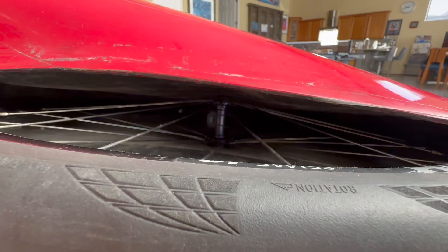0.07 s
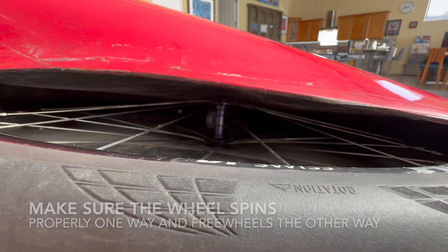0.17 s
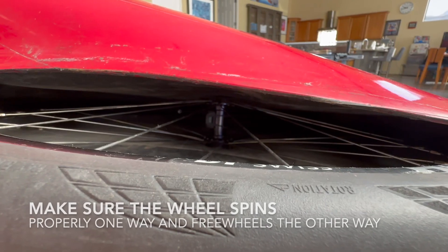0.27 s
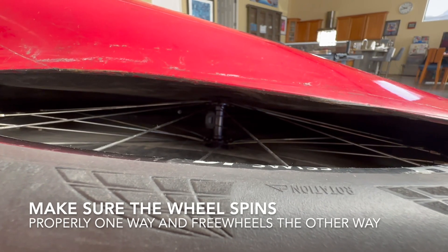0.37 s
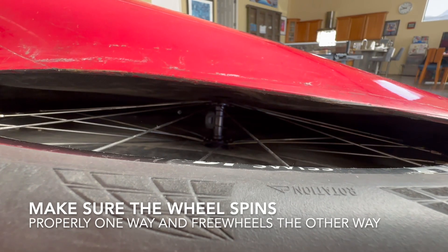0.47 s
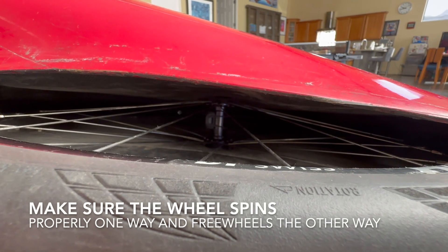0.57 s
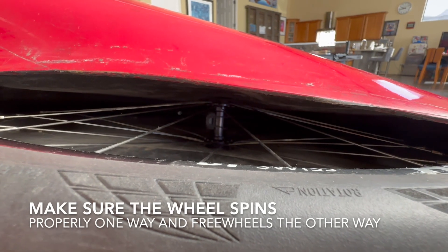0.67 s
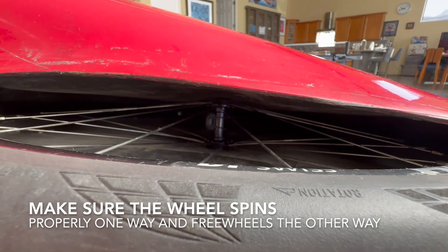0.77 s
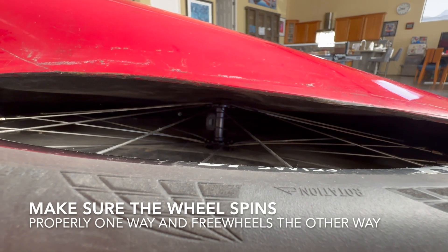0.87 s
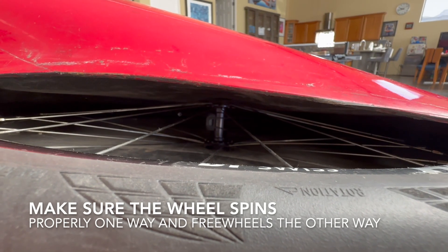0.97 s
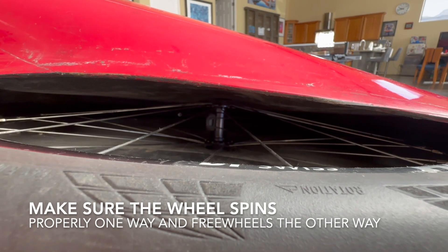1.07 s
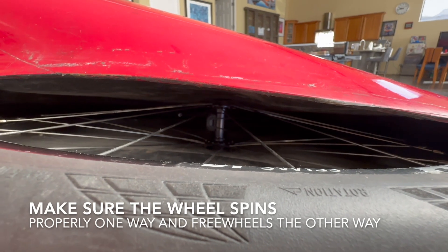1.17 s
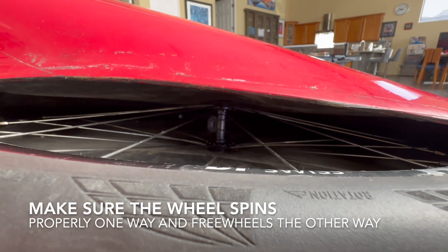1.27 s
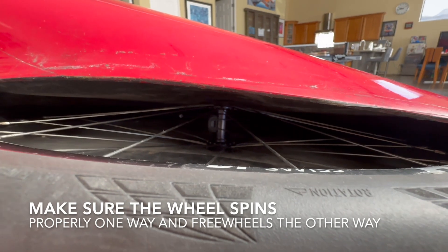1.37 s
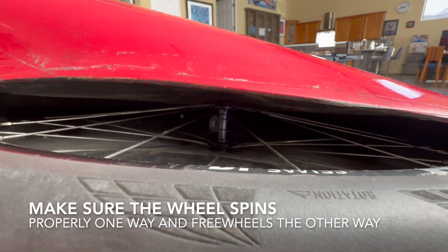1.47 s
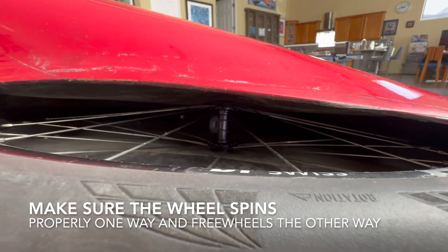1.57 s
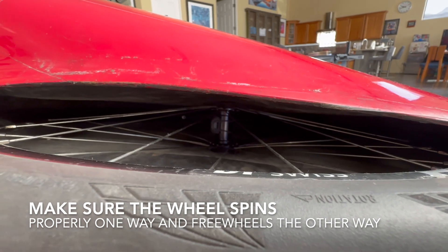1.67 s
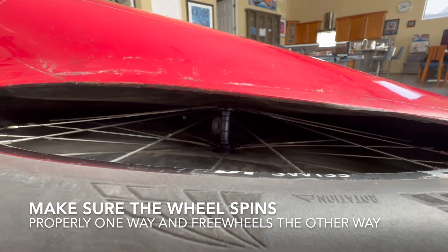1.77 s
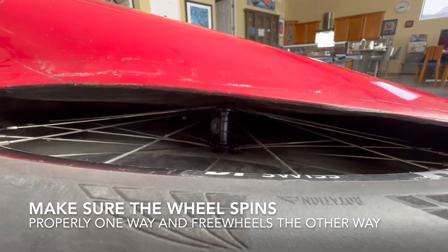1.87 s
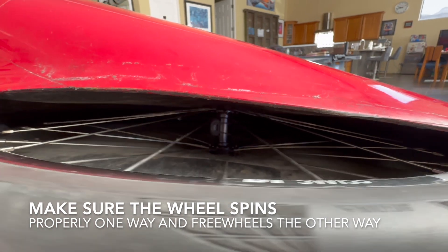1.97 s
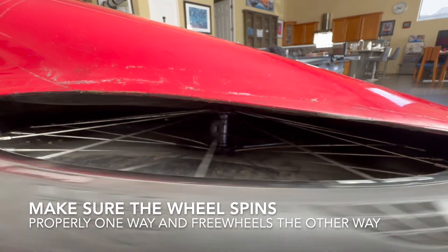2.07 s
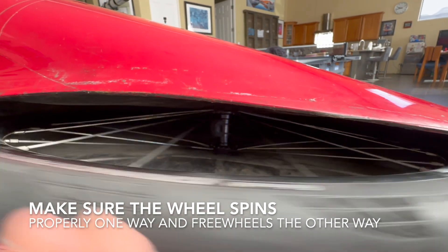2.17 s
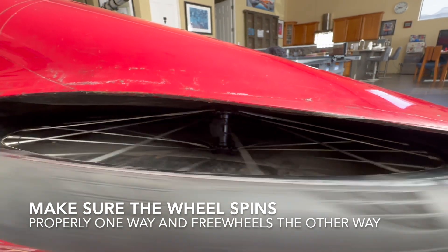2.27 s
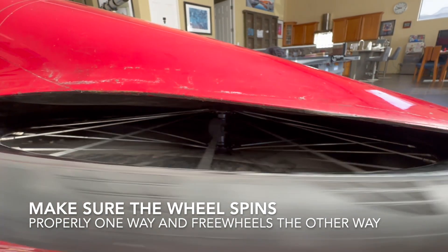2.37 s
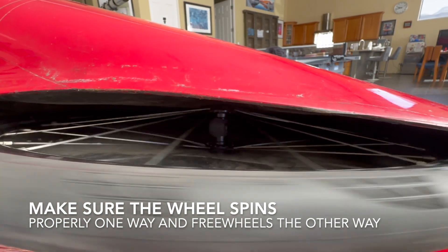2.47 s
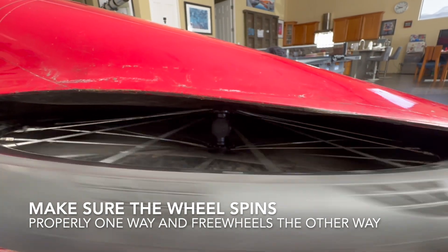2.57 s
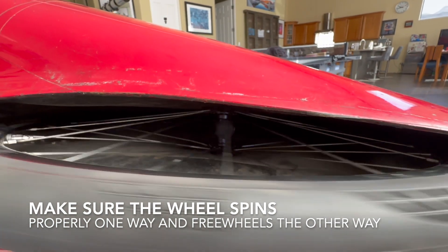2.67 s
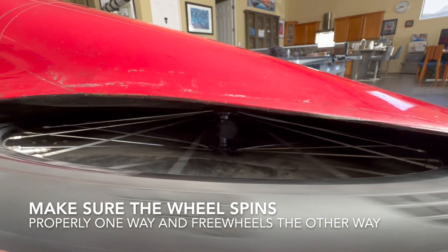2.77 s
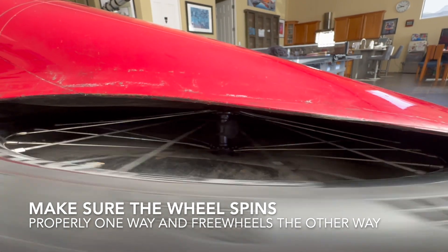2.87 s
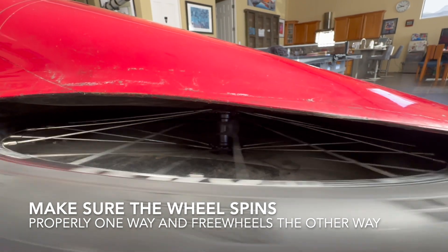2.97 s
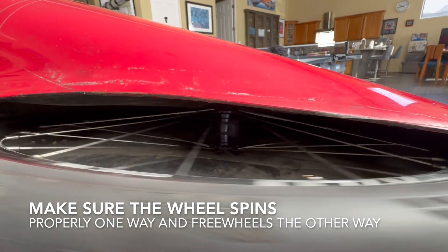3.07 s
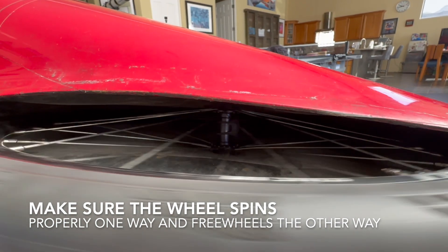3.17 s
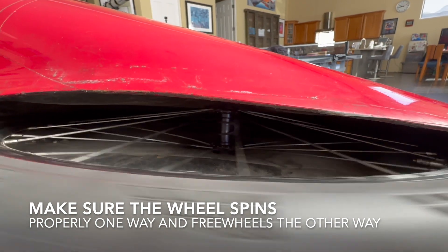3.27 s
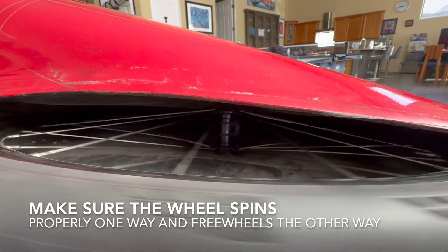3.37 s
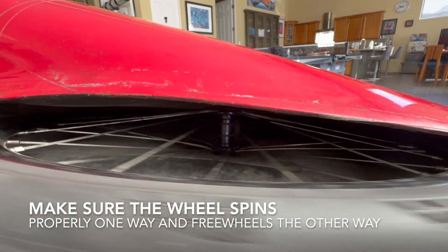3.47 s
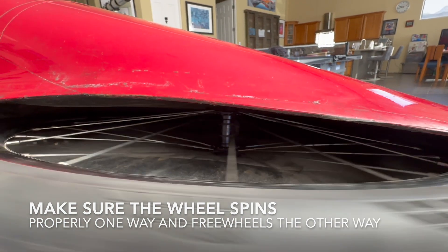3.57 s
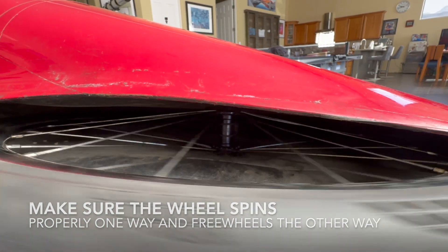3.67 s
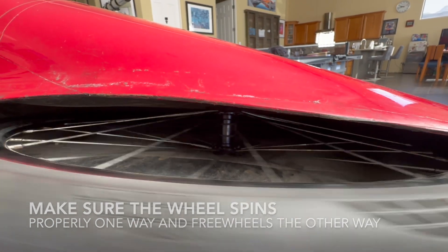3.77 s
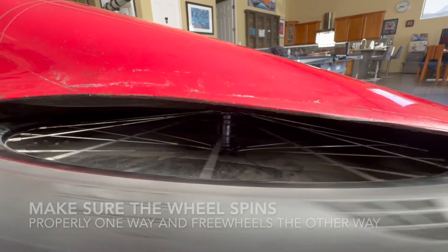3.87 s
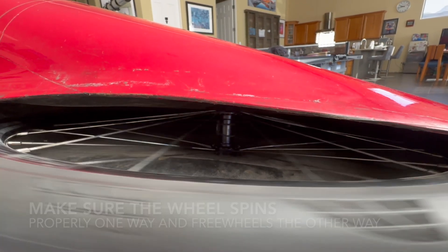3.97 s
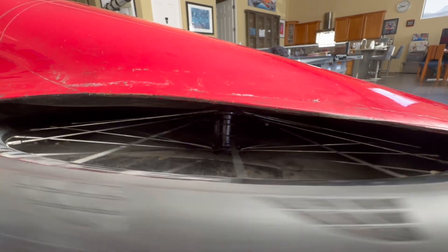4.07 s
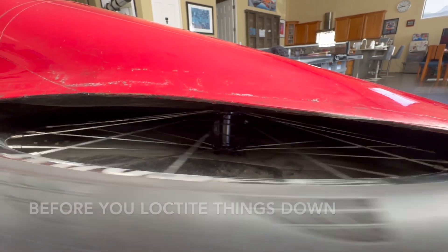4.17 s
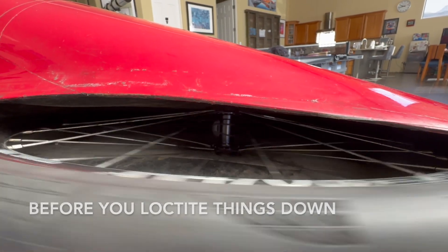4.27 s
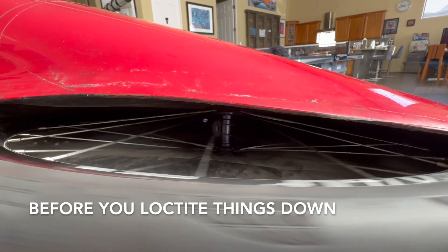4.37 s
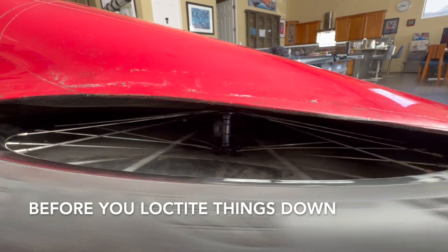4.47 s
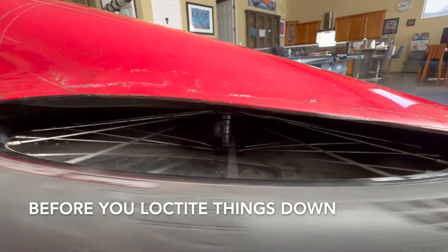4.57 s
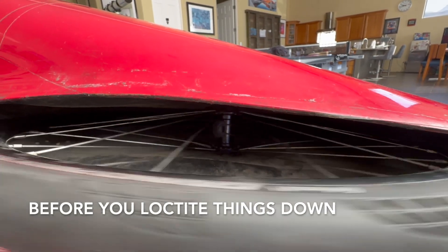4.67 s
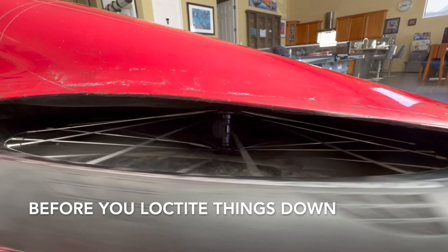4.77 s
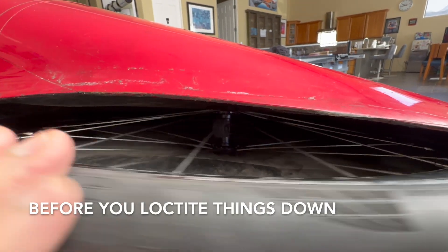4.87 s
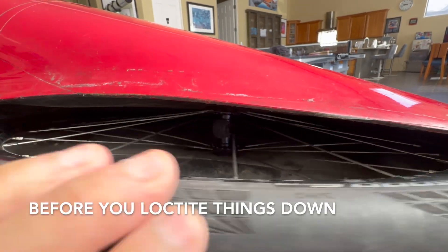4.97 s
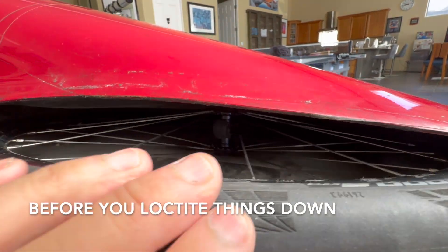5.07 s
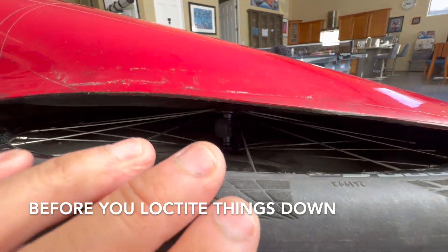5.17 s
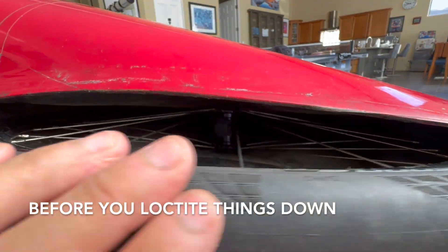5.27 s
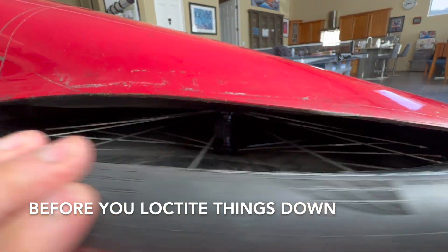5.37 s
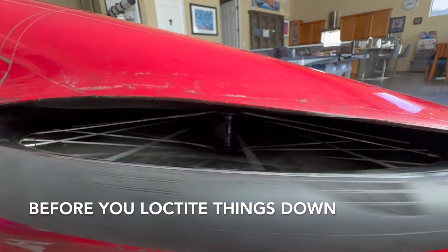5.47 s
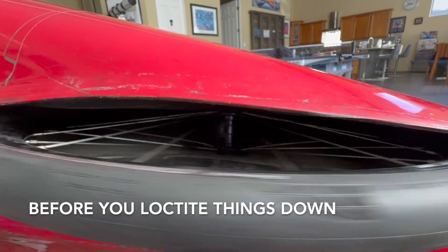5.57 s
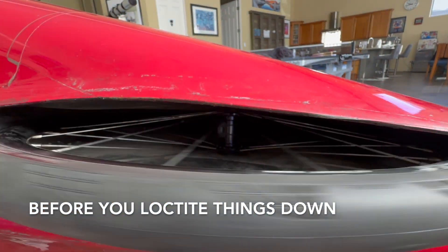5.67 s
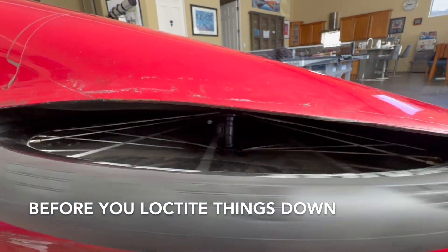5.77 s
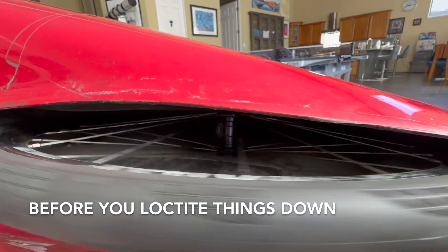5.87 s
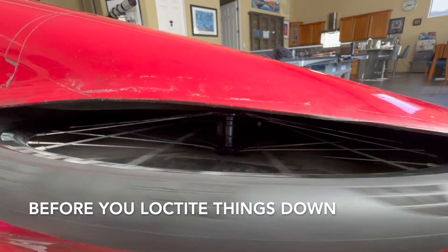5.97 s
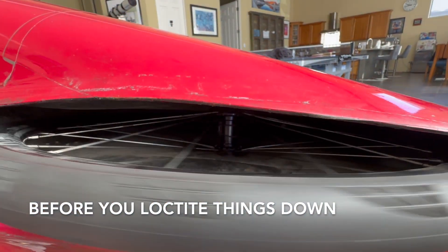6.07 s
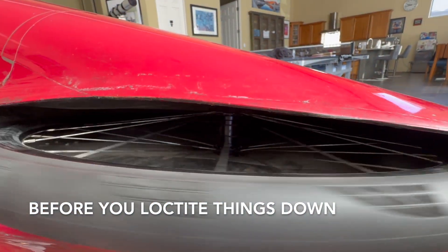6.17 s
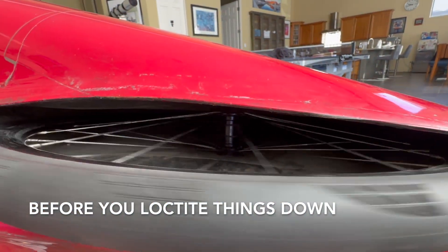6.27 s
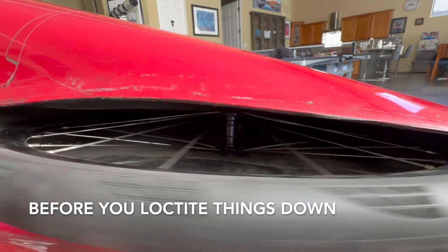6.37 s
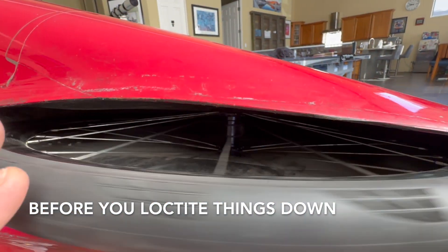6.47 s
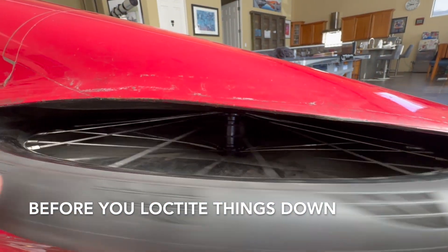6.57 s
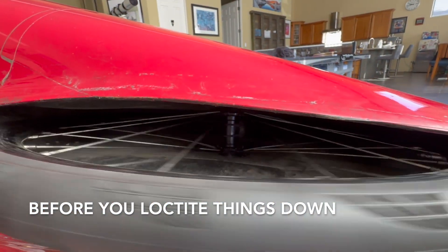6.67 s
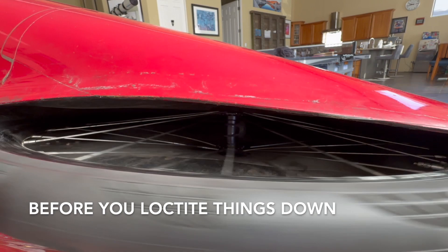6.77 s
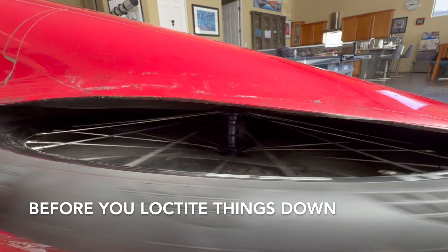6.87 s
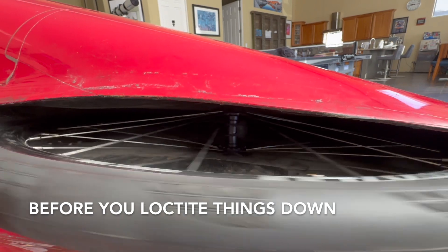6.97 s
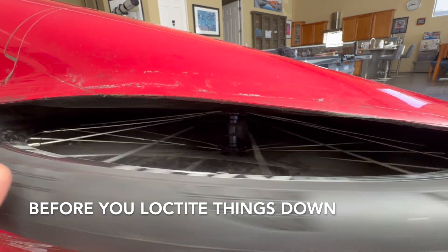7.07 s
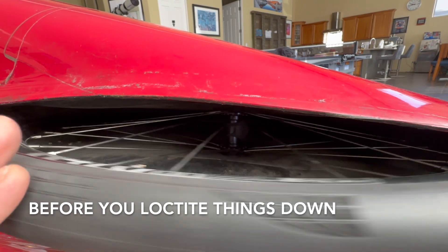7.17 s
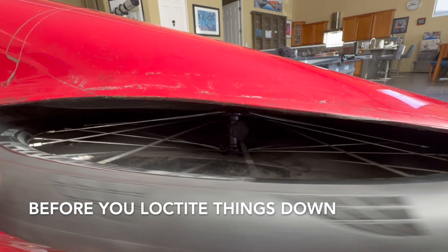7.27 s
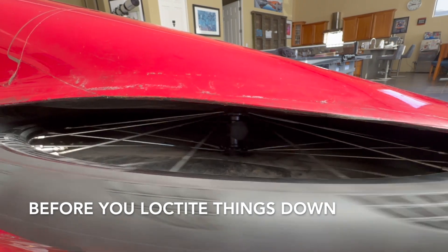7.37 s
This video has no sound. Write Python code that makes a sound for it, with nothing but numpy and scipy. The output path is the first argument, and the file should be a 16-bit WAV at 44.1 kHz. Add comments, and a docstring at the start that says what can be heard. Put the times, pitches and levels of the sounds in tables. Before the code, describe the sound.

A hand-turned cycle wheel, heard very near in a room. Quiet rubs lead to a scuff and about three seconds of regular metallic freewheel clicks, each crisp and ringing briefly, slowing a little throughout. They halt abruptly with soft low knocks. A stronger hollow thump follows as the hub locks, then the wheel runs on quietly, whirring and ticking, and is pushed again with further light bumps.

```python
"""A cycle's spoked rear wheel, hand-turned in a room, close to a stereo microphone: spun backwards it freewheels,
the pawls snapping over the ratchet teeth, slowing, until a hand catches the tyre. Pushed forwards, the hub
locks with a thump in the shell and the drive runs on with a rubbing hiss and light ticks.
Snaps, ticks, rubs and running noise are coloured noise under power envelopes; pings and thumps add decaying sines."""
import sys
import numpy as np
from scipy import signal
from scipy.fft import irfft, next_fast_len
from scipy.io import wavfile

SR = 44100
rng = np.random.default_rng(int(sys.argv[2]) if len(sys.argv) > 2 else 0)


def materialize(psi):
    """Save the field psi as 16-bit PCM at rate SR to the path in sys.argv[1].

    A 1-D psi becomes a single channel; in a 2-D psi each row is a channel.
    """
    bounded = np.clip(np.atleast_2d(psi).T, -1, 1)
    quanta = np.round(bounded * 32767).astype(np.int16)
    wavfile.write(sys.argv[1], SR, quanta)


N = 327663
TIME = np.arange(N) / SR
SIZE = next_fast_len(N, real=True)
HZ = np.maximum(np.arange(SIZE // 2 + 1) * SR / SIZE, 1)  # spectrum bins; the lowest is lifted for logarithms
ROOM_T60_S = 0.45

# resonances of hub and spokes: f/Hz, width/Hz, relative level/dB
HUB_MODES = [(365, 35, 4), (727, 110, 2), (1398, 50, 6), (2020, 63, -2), (2400, 97, 0), (2950, 45, 3),
             (3353, 240, 0), (4720, 50, 5), (5760, 65, 2), (6100, 62, 0), (6293, 70, 3), (6575, 50, 5),
             (7150, 69, 0), (7990, 120, -1), (8786, 85, 2), (9854, 70, 3), (10104, 110, 3), (11796, 110, 1),
             (13436, 135, 1)]
# broad colour of the ringing hub: f/Hz, relative level/dB per Hz
HUB_COLOUR = [(70, -27), (120, -9.5), (170, -6.5), (252, -24), (365, -15), (735, -10.5), (885, -14),
              (1390, -10), (2190, -11), (3310, -1.5), (4200, -7.5), (6400, -5.5), (7540, -4.5),
              (10500, 2.5), (12800, -5), (14600, 1), (16500, -11.5)]
# colour of small contacts in the drive: f/Hz, relative level/dB per Hz
TICK_COLOUR = [(300, -3), (800, -3), (1700, -1), (2100, -4.5), (2500, -1), (2800, -4), (3200, 4),
               (3700, -16), (4300, -10.5), (6500, -14), (10000, -23), (16000, -30)]
# spells when the drive is pushed: start t/s, end t/s, hiss level/dB before the rubbing tightens
PUSHES = [(5.349, 6.223, -57.5), (6.635, 7.424, -56)]


def from_db(db):
    """Decibels to amplitude gain."""
    return 10 ** (np.asarray(db) / 20)


def over_hz(rows):
    """Each column of a table, joined on a log-frequency axis."""
    hz, *columns = np.transpose(rows)
    return [np.interp(np.log(HZ), np.log(hz), column) for column in columns]


def stereo(colour, alike, lean_db, lead):
    """Spectrum of coloured stereo noise, rms 1 over both sides; 'alike' sets how much the sides share."""
    shared, own = rng.standard_normal((2, len(HZ))) + 1j * rng.standard_normal((2, len(HZ)))
    alike = np.clip(alike, 0, 1)
    right = alike * shared + np.sqrt(1 - alike ** 2) * own
    right = right * np.exp(-1j * lead)  # the left side leads in phase
    lean = from_db(lean_db * np.array([[0.5], [-0.5]]))
    both = from_db(over_hz(colour)[0]) * np.array([shared, right]) * lean
    return both * SIZE / np.sqrt(np.sum(np.abs(both) ** 2))


def to_time(spectrum):
    """Spectrum to samples."""
    return irfft(spectrum, SIZE)[..., :N]


def decay(age, t60):
    """Amplitude that falls 60 dB in every t60 seconds."""
    return np.exp(-np.log(1000) * age / t60)


def bursts(times, levels_db, rise, t60):
    """Summed power envelope of blows that swell and die away, each cut off after one second."""
    age, power = TIME[:SR], np.zeros(N + SR)
    shape = ((1 - np.exp(-age / rise)) * decay(age, t60)) ** 2
    for s, db in zip(times, levels_db):
        at = int(np.clip(s * SR, 0, N))
        power[at:at + SR] += from_db(db) ** 2 * shape
    return power[:N]


def held(start, end, attack, release):
    """Gain that rises, holds, then falls 60 dB per release time after the end."""
    rising = np.clip((TIME - start) / attack, 0, 1)
    return rising * from_db(-60 * np.clip((TIME - end) / release, 0, 3))


def uneven(spread_db):
    """Gain that wanders at random around 1, through 30 random points a second."""
    points = rng.standard_normal(1024)
    return from_db(spread_db * np.interp(TIME * 30, np.arange(len(points)), points))


def background():
    """Faint hiss and mains hum under the whole scene."""
    # colour of the hiss: f/Hz, relative level/dB per Hz
    air_colour = [(15, -34), (25, -1), (137, -7), (190, -13), (301, -0.5), (384, -15), (575, -6.5),
                  (695, -26.5), (1520, -17), (1740, -27.5), (3430, -26), (4610, -31), (6740, -21.5),
                  (9070, -39), (16000, -66)]
    # lean of the hiss: f/Hz, left minus right level/dB
    air_lean = [(100, 2), (1500, 1), (3500, 6), (5000, 5.5), (6000, 21.5), (8000, 30), (9600, -8),
                (11000, -1.5)]
    air = to_time(stereo(air_colour, alike=0.35, lean_db=over_hz(air_lean)[0], lead=0))
    hum = np.sin(2 * np.pi * 120 * TIME)
    return from_db(-66.0) * air + from_db(-72.5) * hum


def thumps(place):
    """Soft blows ring the shell; a duller blow reaches fewer of its modes, and loose panels shudder after it."""
    # blows on tyre and frame: t/s, relative level/dB, brightness f/Hz, contact t/s
    blows = [(0.124, -58.5, 900, 0.00092), (0.216, -61.5, 900, 0.00092), (4.871, -27, 172, 0.0033),
             (4.961, -37.5, 250, 0.0033), (5.345, -19, 469, 0.018), (6.559, -65, 900, 0.00097),
             (6.65, -42.5, 600, 0.0027), (6.767, -41.5, 600, .002), (7.157, -46, 250, .003),
             (7.339, -41.5, 700, .003)]
    # modes of shell and frame: f/Hz, relative level/dB, 60 dB decay t/s
    shell_modes = [(107.3, -6.5, 0.35), (133, 2.5, 0.051), (164, -7, 0.12), (216.3, -10, 0.34),
                   (280.5, -23, 0.19), (375.5, 1, 0.069), (477, -16, 0.21), (510, -32, 0.2),
                   (738, -9.5, 0.084), (910, -13, 0.11)]
    # colour of the shuddering panels: f/Hz, relative level/dB per Hz
    panel_colour = [(70, -40), (130, 7), (450, -10.5), (1000, -15), (3000, -28), (9000, -59)]
    shell, age = np.zeros(N + SR), TIME[:SR]
    for s, db, bright_hz, contact in blows:
        at, spread_db = int(s * SR), rng.normal(0, 2.6, len(shell_modes))
        swell = 1 - np.exp(-age / contact)
        for k, (hz, mode_db, t60) in enumerate(shell_modes):
            softening = np.hypot(1, (hz / bright_hz) ** 2)
            gain = from_db(db + mode_db + spread_db[k]) / softening
            gain = gain * (-1) ** k  # neighbouring modes start in opposite directions
            shell[at:at + SR] += gain * np.sin(2 * np.pi * hz * age) * swell * decay(age, t60)
    s, db, bright_hz, _ = np.transpose(blows)
    shudder_db = db - 13.5 + 20 * np.log10(bright_hz / 600)  # brighter blows shake the panels more
    shudder = np.sqrt(bursts(s, shudder_db, rise=0.00033, t60=0.41))
    shell = shell[:N] * from_db([[1.5], [-2.5]])  # left, right
    return shell + shudder * to_time(stereo(panel_colour, *place))


def wheel(place):
    """Running noise: bearing rustle and whirr, rumble and drone through the shell; jolts swell the rumble."""
    # creep, backward throw, freewheel, hold, forward push, run-on, second push: start t/s, end t/s,
    # then base level/dB of rustle, rumble, drone, mid-way whirr, and growth of the whirr level/dB
    moves = [(0.421, 1.508, -81, -85, -74, -64.5, 2), (1.674, 1.982, -60.5, -63, -74, -60.5, -4),
             (2.113, 5.046, -69, -62, -60, -60.5, 5.5), (5.106, 5.353, -65.5, -73, -67.5, -62, 8),
             (5.402, 6.254, -60.5, -61.5, -56, -67.5, -9), (6.294, 6.61, -73, -65, -62, -69, 7),
             (6.637, 7.43, -59.5, -61.5, -59.5, -59.5, 8.5)]
    # deep jolts of the frame: t/s, level/dB
    jolts = [(1.735, -50), (1.89, -47.5), (5.73, -41.5), (6.03, -42.5), (6.25, -55), (6.645, -56),
             (6.8, -56)]
    # colours, each f/Hz, relative level/dB per Hz: bearing rustle, rumble, drone, whirr
    rustle_colour = [(290, -12), (500, -8), (1190, -4.5), (1570, -4), (1850, -4), (2360, -1), (2600, -4.5),
                     (3240, -7.5), (5000, -14), (6500, -35), (11000, -120)]
    rumble_colour = [(15, -26.5), (25, -20), (37, -7), (49, 2.5), (62, 5), (81, -10.5), (112, 1),
                     (140, -7.5), (180, -39), (310, -120)]
    drone_colour = [(82, -16), (140, 0), (216, -3), (253, -8.5), (364, -0.5), (404, -12), (443, -3),
                    (515, -9.5), (600, -18.5), (780, -3), (1320, -120)]
    whirr_colour = [(400, -7.5), (700, -8), (1000, -6.5), (1300, -3.5), (1480, -1), (1600, 4.5),
                    (1720, -6.5), (1900, -22), (3000, -40)]
    rustle = rumble = drone = whirr = 0
    for start, end, rustle_db, rumble_db, drone_db, whirr_db, growth_db in moves:
        moving = held(start, end, attack=0.034, release=0.3)
        progress = np.clip((TIME - start) / (end - start), 0, 1)
        rustle = rustle + moving * from_db(rustle_db)
        rumble = rumble + moving * from_db(rumble_db)
        drone = drone + moving * from_db(drone_db)
        whirr = whirr + moving * from_db(whirr_db + growth_db * (progress - 0.5))
    rumble = np.sqrt(rumble ** 2 + bursts(*np.transpose(jolts), rise=0.013, t60=0.35))
    shaking = uneven(spread_db=1.8)  # rumble and drone waver together
    out = rumble * shaking * to_time(stereo(rumble_colour, *place))
    out = out + drone * shaking * to_time(stereo(drone_colour, *place))
    out = out + rustle * uneven(spread_db=1.8) * to_time(stereo(rustle_colour, *place))
    return out + whirr * to_time(stereo(whirr_colour, alike=0.94, lean_db=-1.0, lead=0))


def scuffs(place):
    """Short rubs against tyre and shell, each a swell of noise in a band around one pitch."""
    # rubs: t/s, level/dB, centre f/Hz, rise t/s, 60 dB decay t/s
    rubs = [(1.200, -48, 5300, 0.04, 0.22), (1.17, -57, 2400, 0.046, 0.34), (1.44, -51, 1200, .03, 0.18),
            (1.745, -50, 2980, 0.017, 0.31), (2.175, -34, 2260, 0.0078, 0.12),
            (5.424, -43.5, 810, .004, 0.29), (6.558, -46.5, 800, 0.0062, 0.15),
            (6.660, -41.5, 1210, 0.029, 0.27), (6.765, -56, 1100, .008, 0.15),
            (7.115, -44, 2720, 0.0084, 0.13), (7.333, -42.5, 330, .006, 0.27)]
    friction, out = to_time(stereo([(20, 0), (20000, 0)], *place)), 0  # flat noise
    for s, db, hz, rise, t60 in rubs:
        bandpass = signal.butter(2, [hz / 1.66, hz * 1.33], "band", fs=SR, output="sos")
        band = signal.sosfilt(bandpass, friction)
        out = out + np.sqrt(bursts([s], [db], rise, t60)) * band / band.std()
    return out


def ticks(place):
    """Small dry contacts in the drive, with a trace of room."""
    # light ticks: t/s, level/dB
    contacts = [(1.675, -57.5), (5.433, -40), (5.72, -47), (5.78, -47), (5.83, -43), (5.931, -47.5),
                (6.031, -46.5), (6.137, -49.5), (6.242, -48), (6.774, -44)]
    s, db = np.transpose(contacts)
    power = bursts(s, db, rise=0.00053, t60=0.12)
    power = power + bursts(s, db - 34, rise=0.012, t60=ROOM_T60_S)
    return np.sqrt(power) * to_time(stereo(TICK_COLOUR, *place))


def pawls(count=40):
    """One snap per tooth of the slowing ratchet, plus those under the hand: t/s, treble snap/dB, hub ring/dB."""
    # single snaps as the hand throws and catches the wheel: t/s, treble snap level/dB, hub ring level/dB
    hand_snaps = [(2.0664, -15, -28), (4.9614, -15, -29)]
    coast_s, teeth_per_s, loss_per_tooth = 2.148, 16.26184, 0.0939  # start, first speed, loss in teeth/s
    tooth = np.arange(count)
    sway = 0.15654 * np.cos(2 * np.pi * (tooth - 9.76088) / 32)  # teeth/s, one slow sway in 32 teeth
    rate = teeth_per_s - loss_per_tooth * tooth + sway
    s = coast_s + np.cumsum(1 / rate) - 1 / rate
    chance = rng.standard_normal((count, 2))
    slowing_db = 0.48 * 20 * np.log10(rate / teeth_per_s)  # the treble softens as the wheel slows
    snap_db = -13 + slowing_db + 0.66 * chance[:, 0]
    ring_db = -27.5 + 0.5 * chance[:, 1]
    return np.vstack([np.column_stack([s, snap_db, ring_db]), hand_snaps])


def ratchet(snaps, place):
    """Each snap rings dense modes of hub and spokes as noise bands with their own rise, decay and room tail."""
    # spread of a snap through the wheel: band f/Hz, relative level/dB, rise t/s, 60 dB decay t/s,
    # room level/dB relative to the band
    ring_bands = [(180, -3, 0.0142, 0.23, -7.5), (460, -1, 0.0072, 0.16, -28), (1104, 2, 0.0055, 0.13, -11),
                  (2740, 2.5, 0.0049, 0.095, -18), (5900, 11, 0.0081, 0.066, -25),
                  (9300, -0.5, 0.0044, 0.059, -27.5), (12200, -2, 0.00075, 0.069, -32),
                  (14100, 3.5, 0.0018, 0.049, -34.5)]
    s, snap_db, ring_db = np.transpose(snaps)
    peaks = sum(from_db(db) ** 2 / (1 + (2 * (HZ - hz) / width) ** 2) for hz, width, db in HUB_MODES)
    metal = stereo(HUB_COLOUR, *place) * np.sqrt(0.5 + 0.7 * peaks)
    centres, out = np.log([row[0] for row in ring_bands]), 0
    for own, (hz, db, rise, t60, room_db) in zip(np.eye(len(ring_bands)), ring_bands):
        band = to_time(metal * np.interp(np.log(HZ), centres, own))  # crossfades into its neighbours
        level = db + (snap_db - 0.5 if hz > 7500 else ring_db + 9.5)
        level = level + rng.normal(0, 1.36, len(s))  # the colour varies from snap to snap
        power = bursts(s, level, rise, t60)
        power = power + bursts(s, level + room_db, rise=0.027, t60=ROOM_T60_S)
        out = out + band * np.sqrt(power)
    return out


def spokes(snaps, place, level_db=-6.5, hub_db=-2.0, spread_db=5.0, t60=0.093, count=20):
    """Thin metallic pings: every snap rings the hub's own modes and a few of the countless modes of the spokes."""
    age, out = TIME[:SR // 10], np.zeros((2, N + SR))
    hub_hz, hub_width, hub_mode_db = np.transpose([row for row in HUB_MODES if row[0] > 1000])
    colour_db = over_hz(HUB_COLOUR)[0]
    for s, snap_db, ring_db in snaps:
        spoke_hz = rng.uniform(2600, 15500, count)
        spoke_spread_db = spread_db * rng.standard_normal(count)
        spoke = from_db(np.interp(spoke_hz, HZ, colour_db) + spoke_spread_db)
        hub_spread_db = spread_db * rng.standard_normal(len(hub_hz))
        hub = from_db(hub_mode_db + np.interp(hub_hz, HZ, colour_db) + hub_spread_db)
        # the modes of each group share a fixed total power
        spoke = spoke / np.linalg.norm(spoke) * from_db(snap_db + level_db)
        hub = hub / np.linalg.norm(hub) * from_db(ring_db + hub_db)
        blow = np.append(spoke, hub)
        hz = np.append(spoke_hz, hub_hz + hub_width * rng.normal(0, 0.09, len(hub_hz)))
        life = t60 * (5000 / hz) ** 0.54  # high modes die sooner; t60 holds at 5 kHz
        step = np.exp((2j * np.pi * hz - np.log(1000) / life) / SR)  # turn and loss per sample
        rings = np.cumprod(np.tile(step[:, None], len(age)), axis=1)
        rings = rings * (1 - np.exp(-age / 0.0025))
        lean_db, lead = (np.interp(hz, HZ, column) for column in place[1:])
        sides = np.array([from_db(lean_db / 2), from_db(-lean_db / 2) * np.exp(-1j * lead)])
        phase = np.exp(2j * np.pi * rng.random(len(hz)))
        at = int(s * SR)
        out[:, at:at + len(age)] += ((sides * blow * phase) @ rings).imag
    return out[:, :N]


def drive(place):
    """The pushed drive hisses, louder where the rubbing tightens."""
    # brief tightenings: t/s, extra level/dB
    swells = [(5.52, 9), (6.2, 7.5), (6.75, 7), (7.15, 7)]
    # colour of the rubbing: f/Hz, relative level/dB per Hz
    rub_colour = [(1470, -69), (2500, -7.5), (3230, -5), (4050, -6.5), (6350, -8), (7590, -12.5),
                  (10400, -7.5), (12200, -9), (14900, -12), (16000, -4.5)]
    pushing = sum(from_db(db) * held(start, end, attack=0.055, release=0.1) for start, end, db in PUSHES)
    tight_db = sum(db / (1 + ((TIME - s) / 0.053) ** 2) for s, db in swells)  # half the extra dB 0.053 s away
    return pushing * from_db(tight_db) * to_time(stereo(rub_colour, *place))


def grit(place, count=96):
    """Grit in the pushed drive makes tiny dry contacts at random moments, about 45 a second."""
    power = 0
    for start, end, _ in PUSHES:
        s = start + np.cumsum(rng.exponential(1, count)) / 45
        s = s[s < end]
        power = power + bursts(s, np.full(len(s), -56.5), rise=0.00047, t60=0.043)
    return np.sqrt(power) * to_time(stereo(TICK_COLOUR, *place))


def scene():
    """The wheel before a pair of microphones: likeness, lean and phase of the two sides vary with frequency."""
    # microphone pair: f/Hz, likeness 0-1, left minus right level/dB
    pair = [(100, 0.82, 4), (405, 0.97, 6), (696, 0, 3.5), (1403, 0.2, 2.5), (2200, 0.44, -2.5),
            (3500, 0, 1.5), (4920, 0.06, 2.5), (6600, 0, 6), (8000, 0.4, 3), (9300, 0.29, -4.5),
            (10050, 0.5, -1), (10540, 1, -0.5), (12500, 1, -0.5), (15000, 0.86, 0.5)]
    # phase by which the left side leads: f/Hz, phase/rad
    left_lead = [(20, 0), (450, 0.5), (1200, 2), (2300, 5.5), (3300, 10.5), (4300, 12.5), (6600, 21),
                 (8000, 19.5), (8800, 24), (9400, 28), (10500, 24.5), (12800, 25), (15500, 23)]
    place = (*over_hz(pair), np.interp(HZ, *np.transpose(left_lead)))
    snaps = pawls()
    freewheel = ratchet(snaps, place) + spokes(snaps, place)
    handling = thumps(place) + scuffs(place)
    pushed_drive = ticks(place) + drive(place) + grit(place)
    return background() + handling + wheel(place) + freewheel + pushed_drive


def record(dry):
    """The microphone ports cut two narrow notches; the sound opens quickly, deep bass and the top are cut."""
    for hz, width_hz, depth_db in [(5280, 117, -6), (7740, 490, -14)]:
        notched = signal.lfilter(*signal.iirnotch(hz, hz / width_hz, fs=SR), dry)
        dry = notched + from_db(depth_db) * (dry - notched)
    dry = signal.sosfilt(signal.butter(4, 40, "high", fs=SR, output="sos"), dry)
    opening = np.clip((TIME - 0.1044) / 0.013, 0, 1)  # silent until 0.1044 s
    lowpass = signal.ellip(10, 0.2, 80, 15900, fs=SR, output="sos")
    return signal.sosfilt(lowpass, dry * opening)


dry = scene()
out = record(dry)
materialize(out)
```